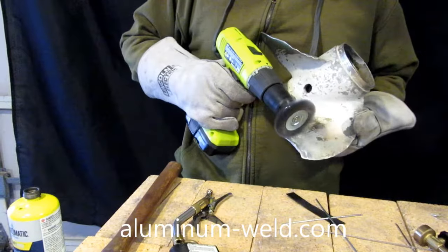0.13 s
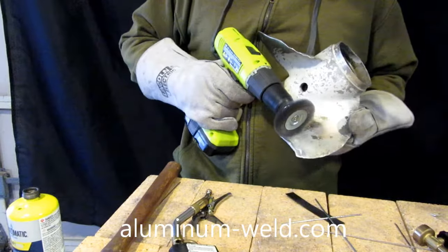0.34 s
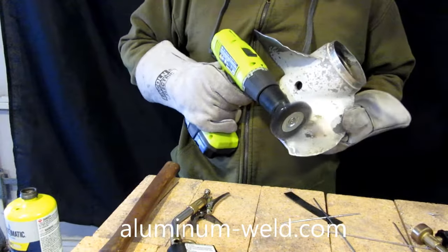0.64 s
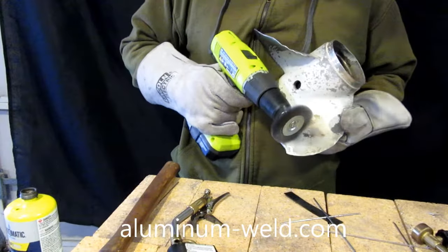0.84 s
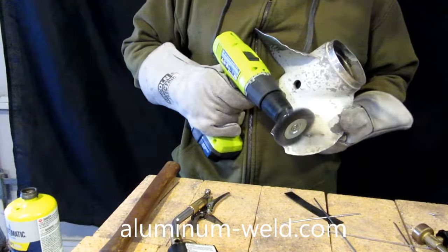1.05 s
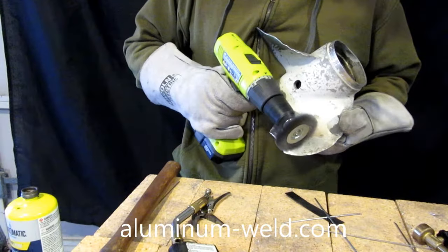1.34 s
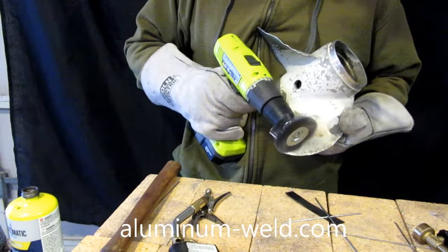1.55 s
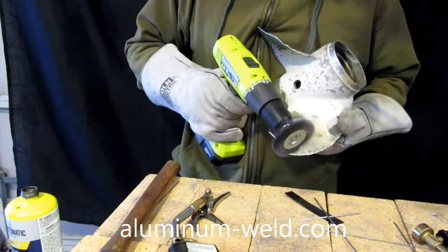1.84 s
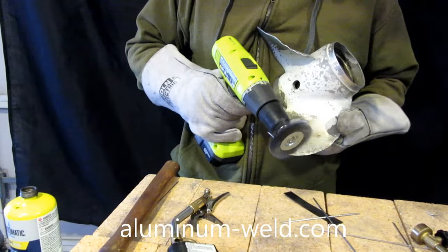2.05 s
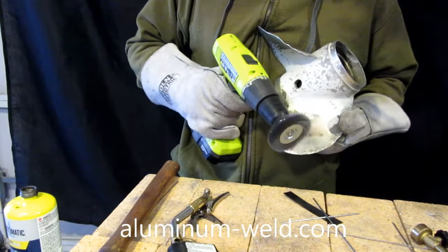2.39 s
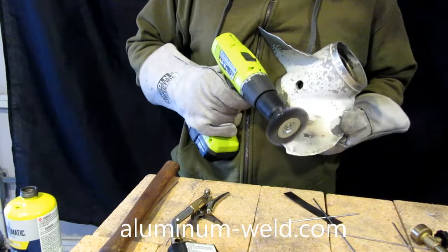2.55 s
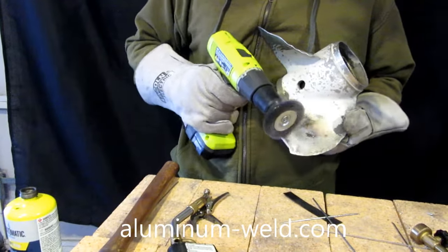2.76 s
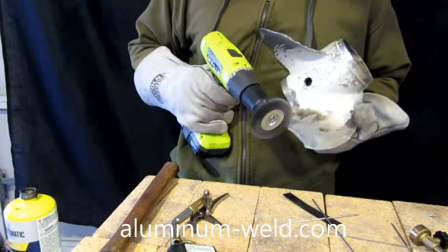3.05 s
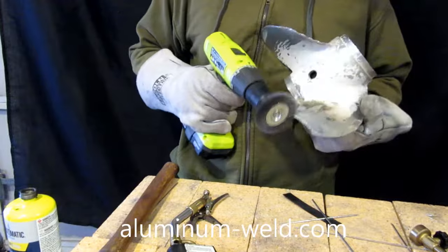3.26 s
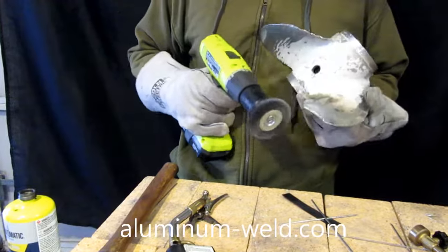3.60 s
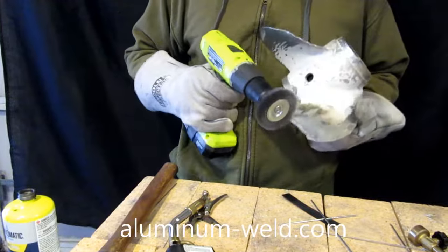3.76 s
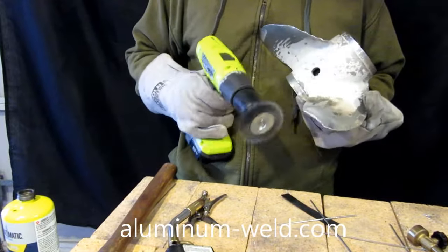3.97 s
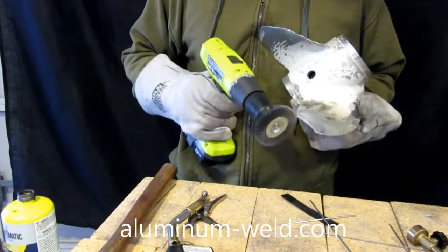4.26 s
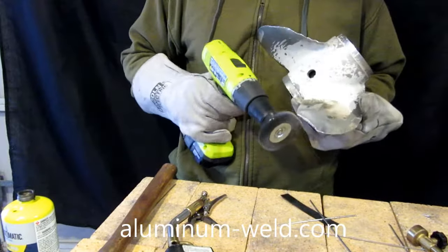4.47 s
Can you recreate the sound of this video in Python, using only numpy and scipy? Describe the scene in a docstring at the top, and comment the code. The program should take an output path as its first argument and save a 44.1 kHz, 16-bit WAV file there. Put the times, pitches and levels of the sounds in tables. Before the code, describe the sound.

A cordless drill whines steadily while its wire wheel scrapes harshly on thin metal, then lifts off, slows, and revs again with brief grazes.

```python
"""Gear whine and rattle over wire scratch: a cordless drill spins a wire wheel on a thin aluminium casting.
The drill is sines locked to its gear speed plus clicks ringing in the housing; the wire tips are dense
clicks that ring modes of the casting, held in a gloved hand. The wheel is lifted off, then grazes an edge
a few times while the trigger is eased and squeezed again; the hub knocks the metal once.
Small workshop with a short decaying-noise tail and a low room tone, one microphone on two equal channels."""
import sys
import numpy as np
from scipy import signal
from scipy.fft import rfft, irfft, next_fast_len
from scipy.io import wavfile
from scipy.ndimage import uniform_filter1d

SR = 44100
rng = np.random.default_rng(int(sys.argv[2]) if len(sys.argv) > 2 else 0)


def put_to_file(sound):
    """Save the sound as 16-bit audio at rate SR, in the file named by the first command-line argument."""
    columns = np.atleast_2d(sound).T  # one column per channel
    safe = np.clip(columns, -1, 1)
    whole_steps = np.round(safe * 32767)
    wavfile.write(sys.argv[1], SR, whole_steps.astype(np.int16))


N = 204403
T = np.arange(N) / SR  # s


def from_db(db):
    """Turn decibels into an amplitude factor."""
    return 10 ** (np.asarray(db) / 20)


def rms_one(x):
    """Scale a signal to rms 1."""
    return x / np.sqrt(np.mean(x ** 2) + 1e-20)


def in_time(rows):
    """Draw straight lines between timed rows, one curve for each column after the time."""
    s, *columns = np.transpose(rows)
    return [np.interp(T, s, column) for column in columns]


def colour(x, spectrum):
    """Give a flat signal the tabled spectrum, interpolated over log frequency; rms 1."""
    size = next_fast_len(N)
    hz = np.maximum(np.arange(size // 2 + 1) * SR / size, 1)
    hz_points, db_points = np.transpose(spectrum)
    gain_db = np.interp(np.log(hz), np.log(hz_points), db_points)
    return rms_one(irfft(rfft(x, size) * from_db(gain_db), size)[:N])


def resonate(x, hz, width_hz):
    """Two-pole resonance with gain 1 on top."""
    r = np.exp(-np.pi * width_hz / SR)
    zeros = [(1 - r * r) / 2, 0, (r * r - 1) / 2]
    poles = [1, -2 * r * np.cos(2 * np.pi * hz / SR), r * r]
    return signal.lfilter(zeros, poles, x)


def drift(rate_hz):
    """Slow chance with spread 1: white noise through two equal one-pole low-passes."""
    r = np.exp(-2 * np.pi * rate_hz / SR)
    slow = signal.lfilter([1], [1, -2 * r, r * r], rng.standard_normal(N + SR))
    return rms_one(slow[SR:])  # the first second lets the filter settle


def grains(per_s, spread_db):
    """Random clicks of uneven size and either sign."""
    sizes = from_db(spread_db * np.minimum(rng.exponential(1, N), 4))
    signs = rng.choice([-1, 1], N)
    struck = rng.random(N) < per_s / SR
    return rms_one(sizes * signs * struck)


def tilt(x, tilt_db):
    """Lean a sound towards treble (positive) or bass around 3 kHz."""
    dull = signal.sosfilt(signal.butter(1, 3000, fs=SR, output="sos"), x)
    return dull * from_db(-tilt_db) + (x - dull) * from_db(tilt_db)


def throb(phase, once_db, twice_db):
    """Load swings once and twice in each turn of the gear train."""
    turn = phase / 36  # mesh cycles in one turn
    return from_db(once_db * np.sin(turn) + twice_db * np.sin(2 * turn))


def room_tone():
    """Steady low noise of the workshop, shaped by its spectrum."""
    # background at the microphone: (f/Hz, level/dB per Hz)
    room_spectrum = [(13, -48), (22, -18), (49, -8.5), (129, -14), (177, -16), (225, -6), (260, -7),
                     (340, -34), (570, -120)]
    return from_db(-63.5) * colour(rng.standard_normal(N), room_spectrum)


def shop(x):
    """A diffuse tail: decaying noise after a short gap, dull on top."""
    t60_s, gap_s, level_db = .3, .004, -17
    after = np.arange(round(.4 * SR)) / SR
    tail = rng.standard_normal(len(after)) * from_db(-60 * after / t60_s) * (after > gap_s)
    tail = signal.sosfilt(signal.butter(1, 5000, fs=SR, output="sos"), tail)
    tail /= np.sqrt(np.sum(tail ** 2))
    return from_db(level_db) * signal.fftconvolve(x, tail)[:N]


def turning():
    """Gear-mesh phase summed from its pitch, with the pitch and the two drill levels."""
    # the drill as the trigger moves: (t/s, gear-mesh f/Hz, mesh whine level/dB, gear rattle level/dB);
    # the whine level is the one before the coasting fade
    drill_run = [(0.0, 1781, -28, -24.5), (0.15, 1714, -19.5, -23.5), (0.32, 1687, -24.5, -28),
                 (0.93, 1698, -23, -25.5), (1.19, 1651, -25, -25), (1.4, 1681, -29, -25.5),
                 (1.75, 1672, -27, -25.5), (2.05, 1688, -29.5, -27), (2.3, 1669, -27, -26.5),
                 (2.47, 1686, -28, -24), (2.63, 1670, -23, -22.5), (2.93, 1552, -29.5, -24),
                 (2.99, 1584, -25.5, -25), (3.2, 1815, -28, -25), (3.26, 1718, -28, -28.5),
                 (3.29, 1489, -27.5, -24), (3.42, 1052, -51, -29.5), (3.6, 763, -51, -29),
                 (3.82, 903, -46, -26.5), (3.92, 1226, -39.5, -28), (4.04, 1360, -37, -25),
                 (4.14, 1437, -33.5, -25.5), (4.19, 1338, -45, -32), (4.37, 1483, -35, -28.5),
                 (4.44, 1466, -36.5, -27), (4.5, 1371, -38, -26), (4.63, 1107, -53, -28)]
    mesh_hz, mesh_db, rattle_db = in_time(drill_run)
    phase = 2 * np.pi * np.cumsum(mesh_hz) / SR
    return phase, mesh_hz, mesh_db, rattle_db


def gear_rattle(phase, bright_db):
    """Tooth clicks, throbbing with the turn, that ring in the plastic housing."""
    # tooth rattle before the housing: (f/Hz, level/dB per Hz)
    rattle_spectrum = [(71, -41), (120, -32), (505, -16), (772, -7.5), (1160, -10.5), (1360, -6),
                       (1500, -9), (2170, -3.5), (2490, -5), (6460, -11), (15100, -31.5)]
    # housing resonances, relative to the teeth: (f/Hz, width/Hz, level/dB)
    housing = [(304.4, 12.3, 13.5), (626, 29.5, 5.5), (2210, 59, -19), (6640, 160, 0.5), (9030, 630, 3.5),
               (10900, 1600, -2)]
    teeth = colour(grains(14000, spread_db=1.8), rattle_spectrum)
    teeth *= throb(phase, once_db=.3, twice_db=.4)
    rattle = teeth.copy()
    for hz, width_hz, level_db in housing:
        rattle += from_db(level_db) * resonate(teeth, hz, width_hz)
    return tilt(rms_one(rattle), bright_db)


def whine(phase, level_db, flutter_db, wander):
    """A sine locked to the speed that flutters in level and wanders in phase (rad)."""
    level = from_db(level_db + flutter_db * drift(22))
    return np.sqrt(2) * level * np.sin(phase + wander * drift(25))


def gear_whines(phase, mesh_hz, mesh_db, hum_db, singing_db, octave_db, side_db):
    """Mesh whine, low hum, singing whine and side whines at fixed multiples of the mesh pitch."""
    # side whines of motor and gears: (multiple of mesh f, level/dB relative to the side level)
    side_whines = [(.21, -25.5), (2.05, -6), (2.34, -4), (2.51, -15), (2.925, -3), (3.77, -6), (4.601, -24)]
    hum_multiple, singing_multiple = .4155, 1.556
    out = whine(phase, mesh_db, flutter_db=1.2, wander=.26)
    out += whine(hum_multiple * phase, hum_db, flutter_db=1.5, wander=.3)
    out += whine(singing_multiple * phase, singing_db, flutter_db=1.5, wander=.9)
    out += whine(2 * singing_multiple * phase, octave_db, flutter_db=2.0, wander=1.0)
    for multiple, level_db in side_whines:
        out += whine(multiple * phase, side_db + level_db, flutter_db=2.0, wander=.7)
    # below this mesh pitch the whines fade steadily while the rattle goes on
    coast_hz, coast_db_per_hz = 1210, .07
    return out * from_db(-coast_db_per_hz * np.maximum(coast_hz - mesh_hz, 0))


def drill(phase, mesh_hz, mesh_db, rattle_db):
    """Whines locked to the speed over gear rattle; mesh whine and rattle levels follow the timed run."""
    # what the speed sets; the hum swells as it passes the housing resonance; whines before the coasting fade:
    # (mesh f/Hz, low hum level/dB, singing whine level/dB, its octave level/dB, side level/dB,
    # rattle brightness/dB)
    by_speed = [(900, -60, -57, -57, -40, 0.5), (1217, -52, -40, -35, -44, 0.5),
                (1320, -55, -38, -39, -37, 2.5), (1390, -47, -40.5, -45, -40, 2),
                (1463, -36, -34.5, -54, -43.5, 3.5), (1590, -51, -36.5, -44, -36, 1),
                (1660, -42.5, -35, -34, -36, 0.5), (1688, -37, -35.5, -39, -37.5, 1),
                (1750, -55, -37, -41, -37, 1.5), (1850, -58, -45, -40, -37, 3)]
    speeds_hz, *columns = np.transpose(by_speed)
    *whines_db, bright_db = (np.interp(mesh_hz, speeds_hz, column) for column in columns)
    whines = gear_whines(phase, mesh_hz, mesh_db, *whines_db)
    return whines + from_db(rattle_db) * gear_rattle(phase, bright_db)


def knock():
    """The hub knocks the casting: a short swing of force with a quick rebound and a gritty crack."""
    # hub knocks: (t/s, strength/dB before the high-pass)
    hub_knocks = [(4.1641, 0)]
    out = np.zeros(N)
    for s, strength_db in hub_knocks:
        after = np.maximum(T - s, 0)
        grit = .3 * rng.standard_normal(N) * (T > s)
        swing = np.sin(2 * np.pi * 2300 * after) + grit
        out += from_db(strength_db) * swing * np.exp(-after / .0005)
    no_thump = signal.butter(2, 550, "high", fs=SR, output="sos")
    return signal.sosfilt(no_thump, out)


def contact():
    """Scratch level, brightness and place of the wires over time."""
    # place: 0 lower face, 1 upper face, 2 edge, 3 lip; between them blended, outside them the nearest
    # wheel pressed on until lifted off at the last row: (t/s, scratch level/dB, brightness/dB, place)
    pressed = [(0.0, -18, -0.36, 0), (0.45, -17.5, -0.96, -0.5), (1.15, -17.5, -1, 0.83),
               (1.48, -18, -0.55, 0.42), (1.68, -14.5, -1, 1.5), (1.91, -17.5, 1, 1), (2.15, -17, 0.5, 0.5),
               (2.58, -15, 0.81, 1.8), (2.66, -18.5, -0.19, 1.3), (2.88, -14, 1.68, 1.54),
               (3.01, -15.5, -0.076, 1.9), (3.11, -27.5, 1, 2.5), (3.2, -26.5, -0.043, 2.6),
               (3.25, -30, 0.48, 1.5)]
    # grazes: (t/s, length/s, rise/s, fall/s, level at first/dB, level at last/dB, place)
    grazes = [(3.262, 0.032, .022, 0.016, -17, -14, 2.45), (3.35, .038, 0.0076, .02, -25, -21, 2),
              (3.398, 0.0023, 0.017, 0.017, -17, -15, 1.93), (3.687, 0.0084, 0.0067, 0.028, -21, -29, 4.5),
              (3.704, 0.031, .02, 0.031, -18, -22, 2.8), (3.811, 0.082, 0.057, 0.031, -15.5, -16.5, 2.03),
              (4.154, .014, 0.02, 0.014, -11.5, -16.5, 2.4)]
    edge_db = 20  # a graze climbs this far during its rise and drops this far during its fall
    trail_db, trail_db_per_s = -15.5, 123  # the longest wires keep brushing a little longer
    scratch_db, bright_db, _ = in_time(pressed)
    level = from_db(scratch_db) * (T < pressed[-1][0])
    places = [(s, place) for s, _, _, place in pressed]
    for s, length_s, rise_s, fall_s, first_db, last_db, place in grazes:
        before = np.maximum(s - T, 0)
        after = np.maximum(T - s - length_s, 0)
        held_db = np.interp(T, [s, s + length_s], [first_db, last_db])
        held_db -= edge_db * before / rise_s
        fall = from_db(-edge_db * after / fall_s)
        trail = from_db(trail_db - trail_db_per_s * after)
        level += from_db(held_db) * np.maximum(fall, trail)
        places += [(s, place), (s + length_s, place)]
    return level, bright_db, in_time(places)[0]


def brush(phase, level, bright_db):
    """Dense wire strikes throbbing with the turn; the brightness curve tilts them to treble or bass."""
    # wire scratch before the tilt and the casting: (f/Hz, level/dB per Hz)
    scratch_spectrum = [(26, -72), (45, -34), (219, -25.5), (526, -20), (687, -15.5), (795, -13.5),
                        (989, -8), (1230, -9), (1650, -5), (1820, -9.5), (1960, -5.5), (6600, -10.5),
                        (10700, -16.5), (15100, -26.5)]
    tips_per_s = 9000
    tips = colour(grains(tips_per_s, spread_db=2.4), scratch_spectrum)
    tips *= throb(phase, once_db=.5, twice_db=.6)
    smooth_level = uniform_filter1d(level, size=88)  # about 2 ms
    return smooth_level * from_db(0.46 * drift(60)) * tilt(tips, bright_db)


def casting(force, place):
    """The force heard directly plus every mode, weighted by where the wires touch."""
    # scratch heard without the modes: (level/dB on lower face, upper face, edge, lip)
    direct_db = [-4, -4, -12, -9]
    # modes of the casting: (f/Hz, width/Hz, level/dB on lower face, upper face, edge, lip)
    modes = [(149, 31, -10, 0, -2, -8), (221.6, 17, 3, 8.5, -9, -3), (613, 23, 9, 6.5, 3, 11),
             (985, 26.4, -2.5, 10, -2, -9), (1018, 32, -16, 6, -5, -10), (2115, 110, -5.5, -3, -13, -5.5),
             (2710, 125, 0, -4.5, -29, 1), (3030, 94, -2, -11.5, -10, -1), (3370, 94, -12, -10, -18, 6),
             (3536, 125, -2.5, -1.5, -13, 0), (3940, 154, 3, -0.5, -12.5, -5),
             (4183, 150, -13, 6, -1.5, -7), (5320, 620, -4, -7, -7.5, -14), (6730, 106, 0, 0.5, -4, -6),
             (9240, 510, -17, -8, -11, -9), (13600, 170, -21, -7, -9, -9), (1971, 25, 7, -0.5, 13.5, -3),
             (2778, 130, -14, -16, 6, 11), (4770, 223, -6, -13.5, 6, -7), (6370, 143, -7, -4, 6, 2),
             (8010, 410, -9, -19, 3, -1), (10380, 630, -8, -18.5, 0.5, -5)]
    places = np.arange(len(direct_db))
    out = force * from_db(np.interp(place, places, direct_db))
    for hz, width_hz, *levels_db in modes:
        grip_db = 1.8 * drift(6)  # the grip shifts, so each mode swells and fades
        drive = force * from_db(np.interp(place, places, levels_db) + grip_db)
        out += resonate(drive, hz, width_hz)
    return out


def scene():
    """Drill, casting, workshop tail and room tone at one microphone, on two equal channels."""
    phase, mesh_hz, mesh_db, rattle_db = turning()
    level, bright_db, place = contact()
    blow = knock()
    # the knock is heard directly, and a smaller share of it rings the casting
    force = brush(phase, level, bright_db) + from_db(-5) * blow
    near = drill(phase, mesh_hz, mesh_db, rattle_db) + casting(force, place) + blow
    return np.tile(near + shop(near) + room_tone(), (2, 1))


def record(dry):
    """Full scale clips, then a steep low-pass cuts the top."""
    steep = signal.ellip(14, .3, 60, 14990, fs=SR, output="sos")
    return signal.sosfilt(steep, np.clip(dry, -1, 1))


dry = scene()
out = record(dry)
put_to_file(out)
```